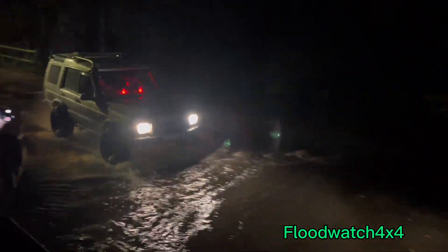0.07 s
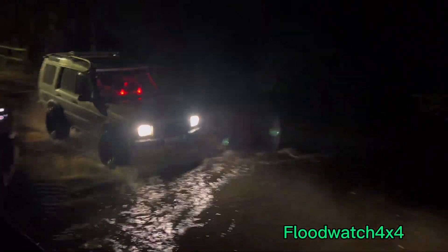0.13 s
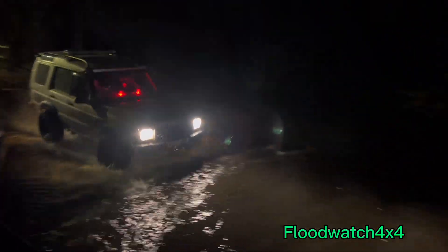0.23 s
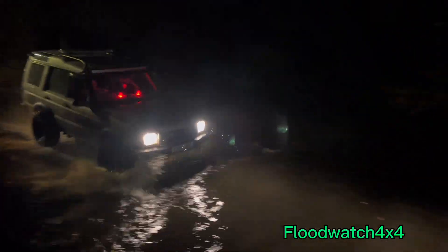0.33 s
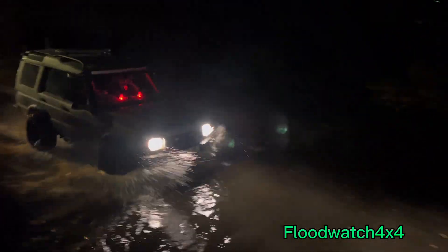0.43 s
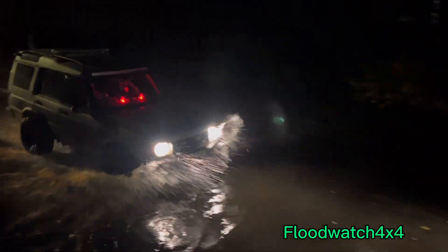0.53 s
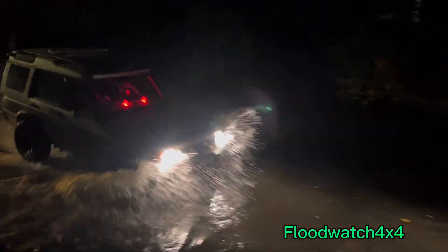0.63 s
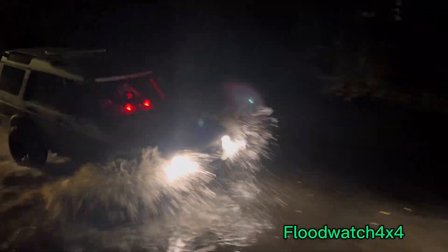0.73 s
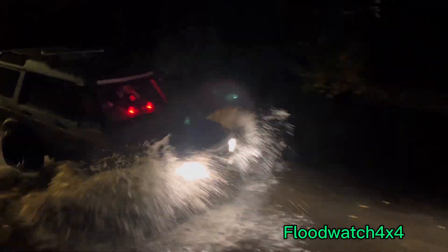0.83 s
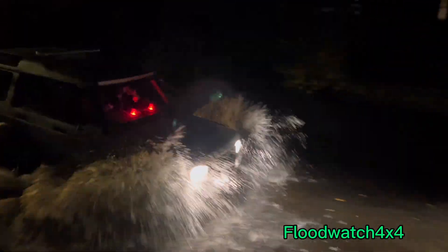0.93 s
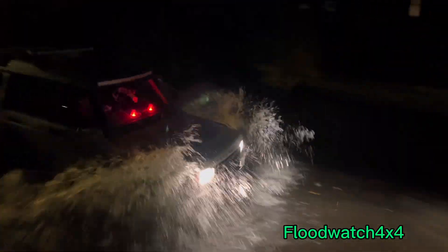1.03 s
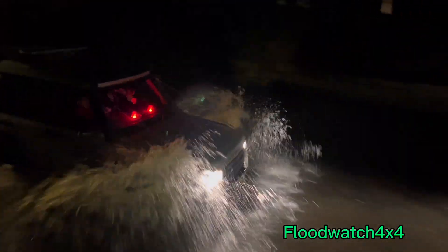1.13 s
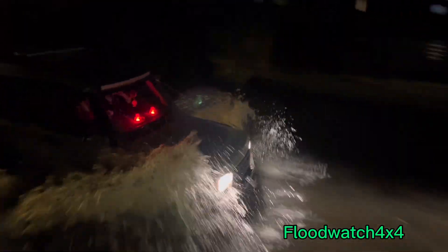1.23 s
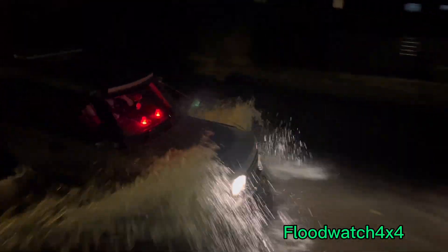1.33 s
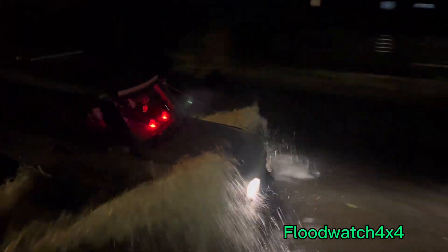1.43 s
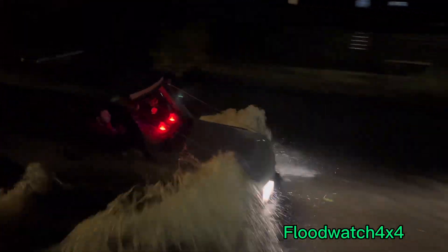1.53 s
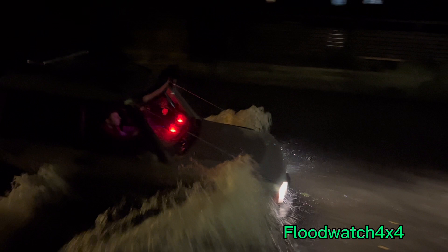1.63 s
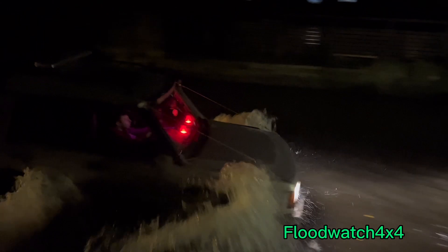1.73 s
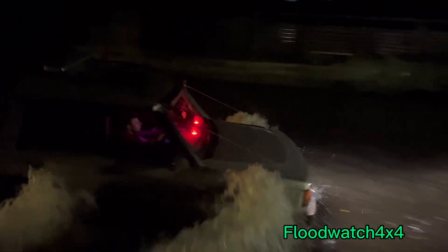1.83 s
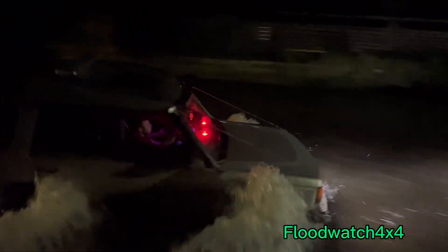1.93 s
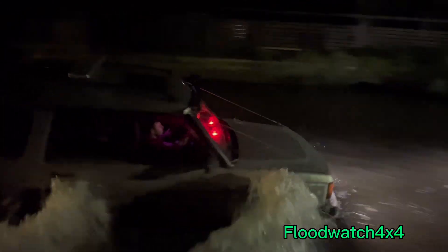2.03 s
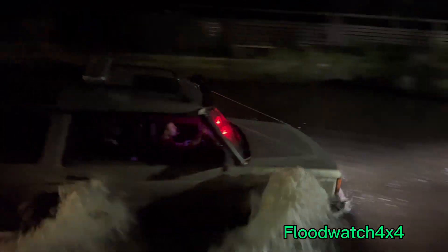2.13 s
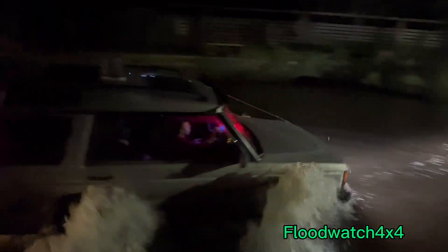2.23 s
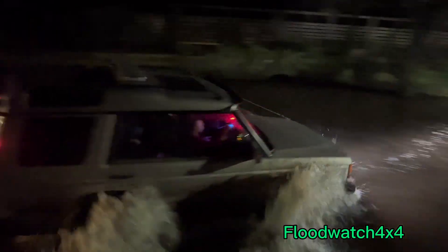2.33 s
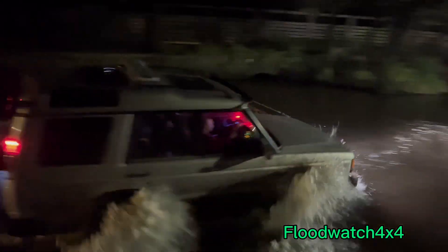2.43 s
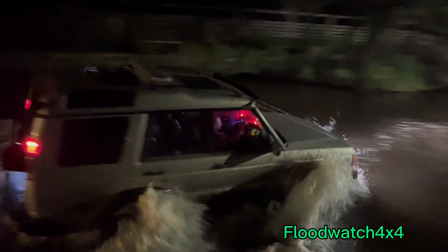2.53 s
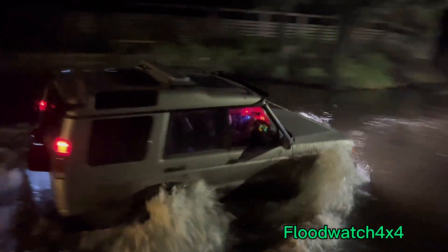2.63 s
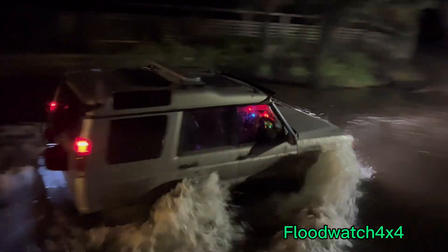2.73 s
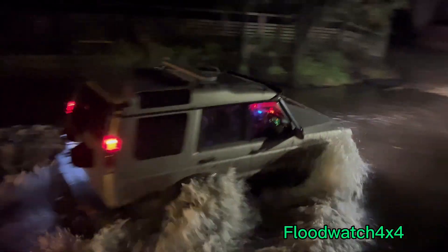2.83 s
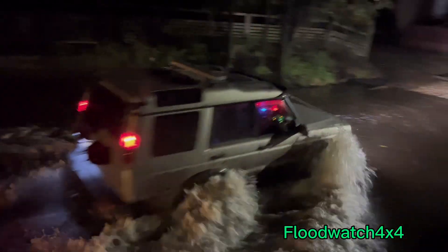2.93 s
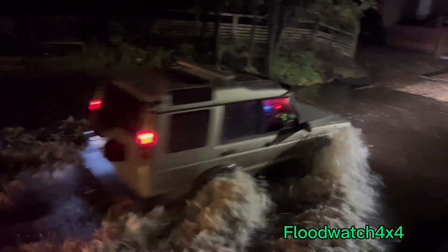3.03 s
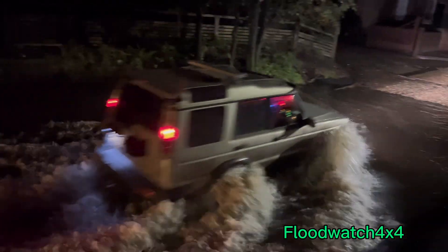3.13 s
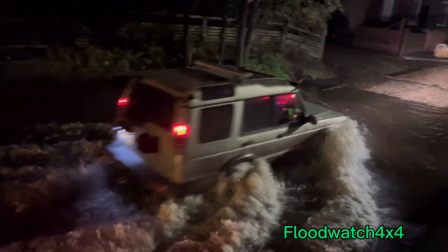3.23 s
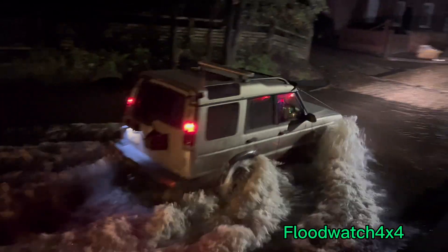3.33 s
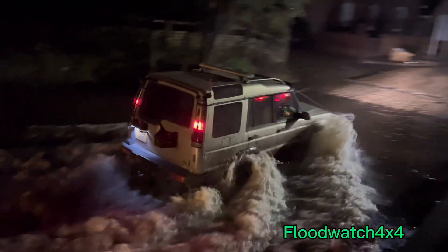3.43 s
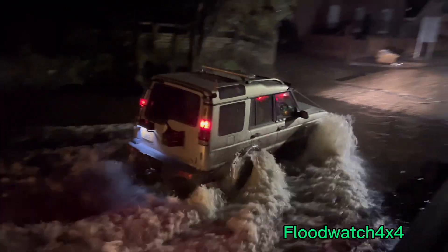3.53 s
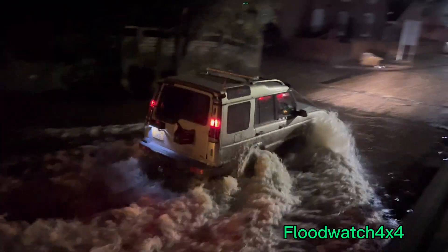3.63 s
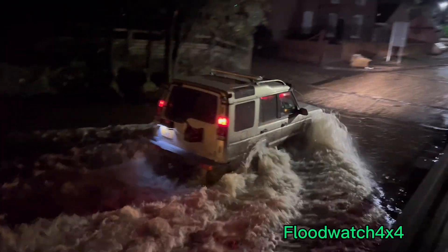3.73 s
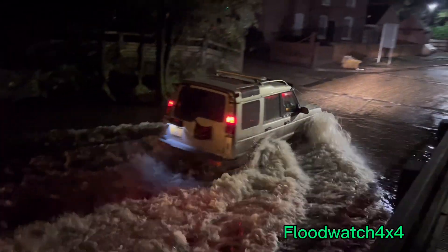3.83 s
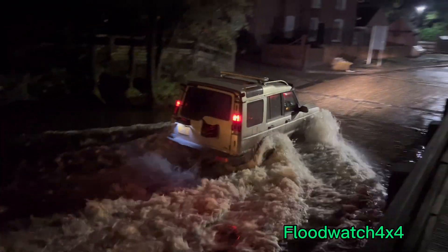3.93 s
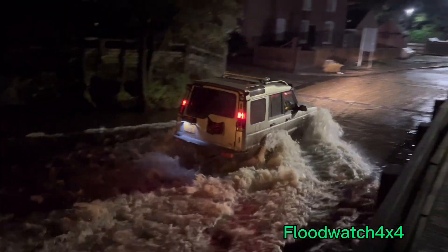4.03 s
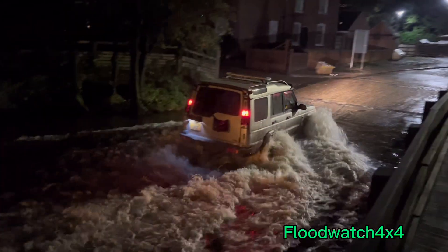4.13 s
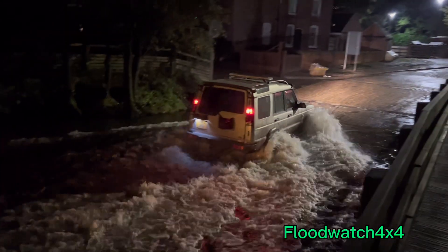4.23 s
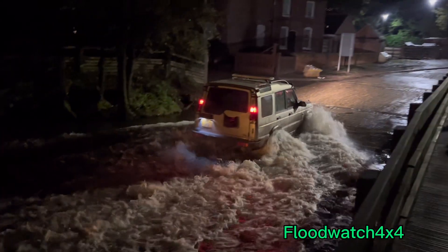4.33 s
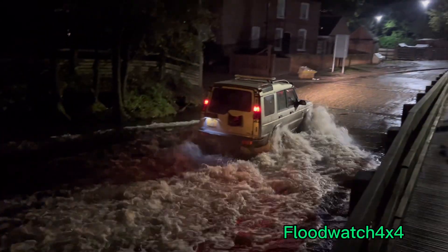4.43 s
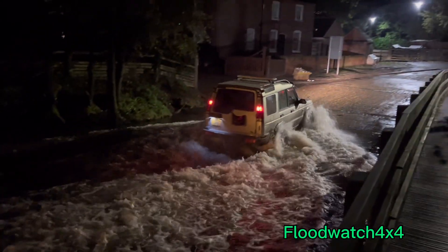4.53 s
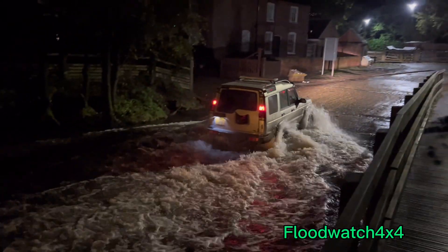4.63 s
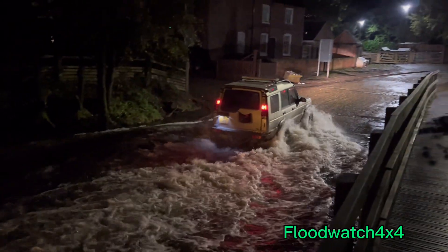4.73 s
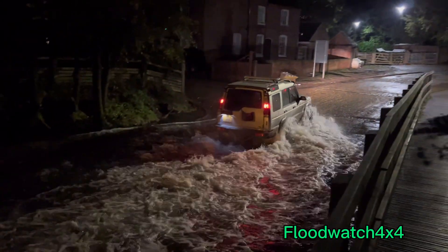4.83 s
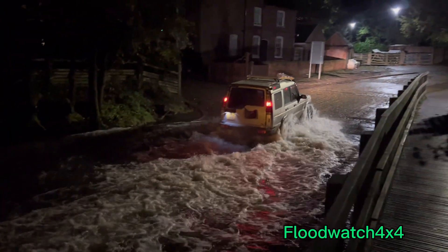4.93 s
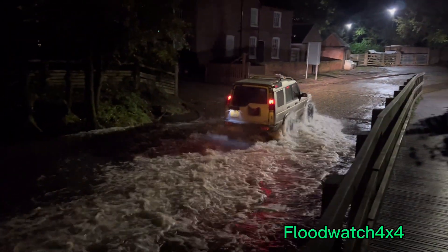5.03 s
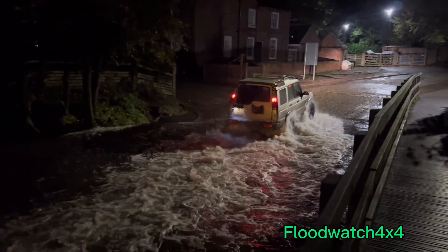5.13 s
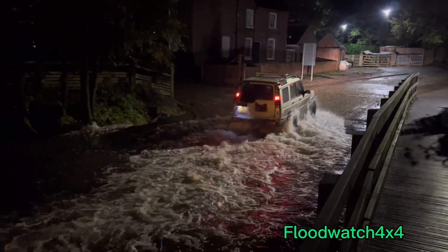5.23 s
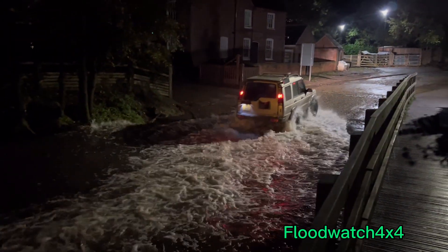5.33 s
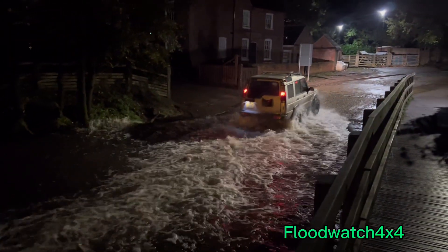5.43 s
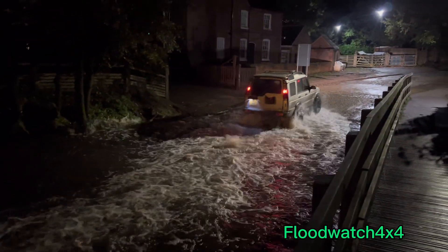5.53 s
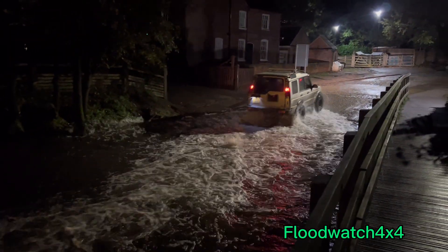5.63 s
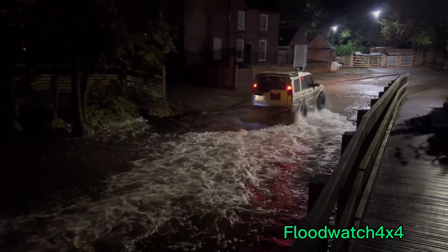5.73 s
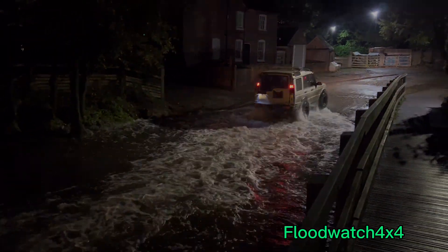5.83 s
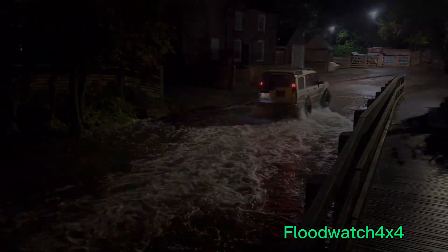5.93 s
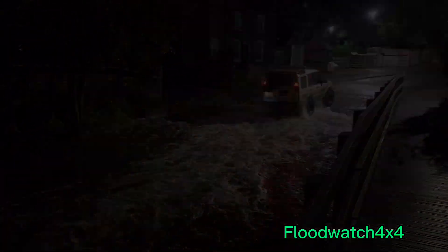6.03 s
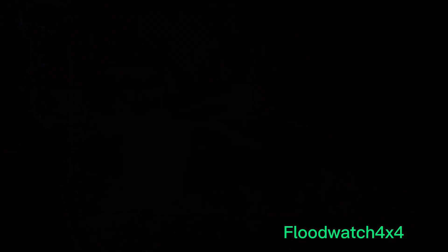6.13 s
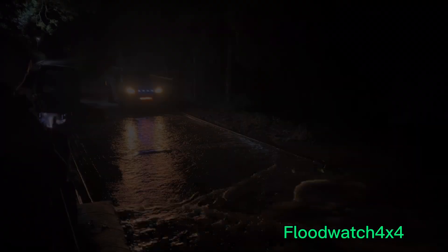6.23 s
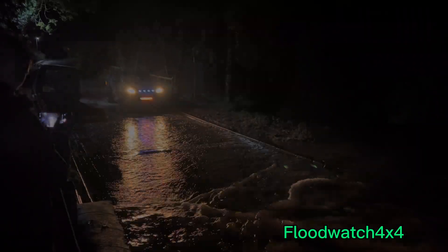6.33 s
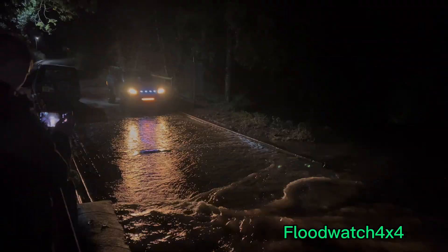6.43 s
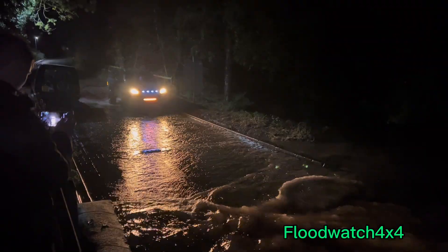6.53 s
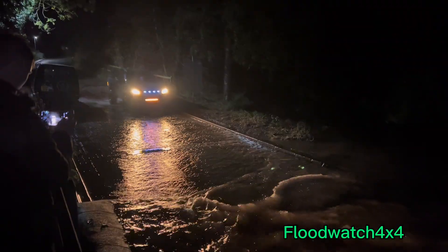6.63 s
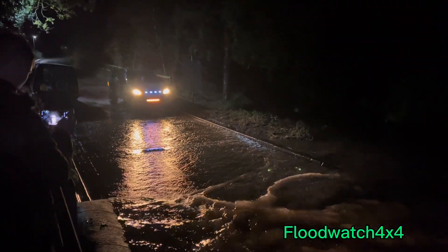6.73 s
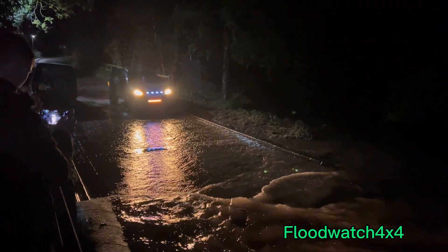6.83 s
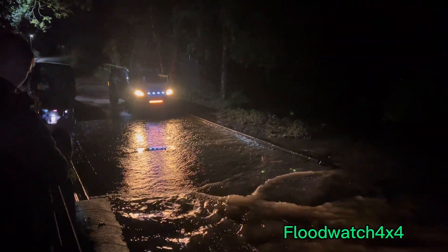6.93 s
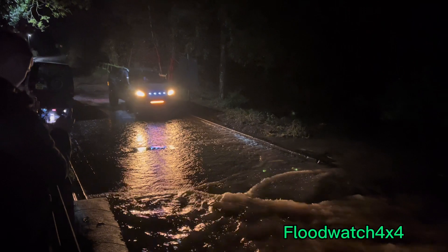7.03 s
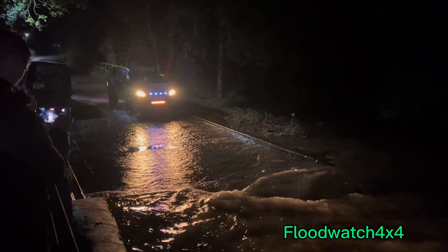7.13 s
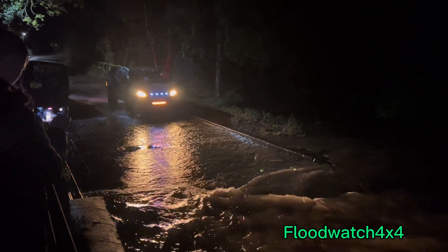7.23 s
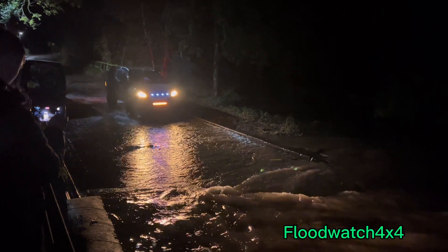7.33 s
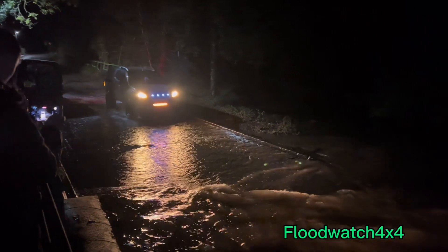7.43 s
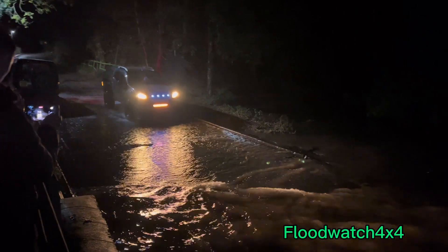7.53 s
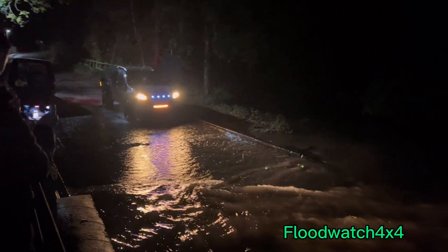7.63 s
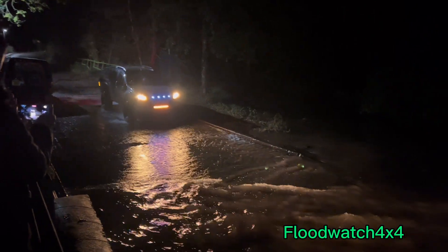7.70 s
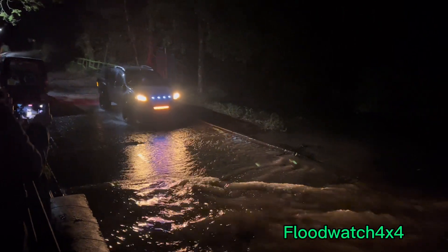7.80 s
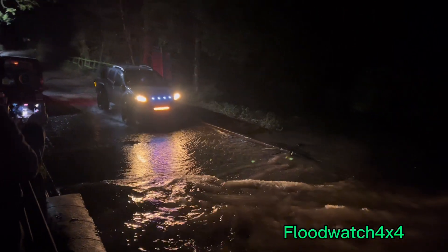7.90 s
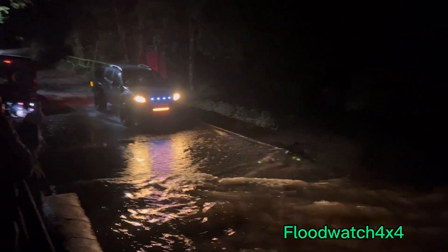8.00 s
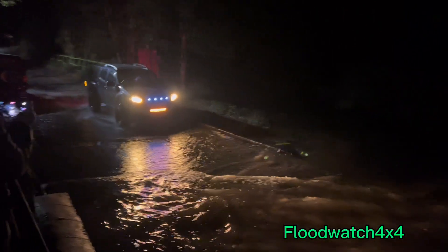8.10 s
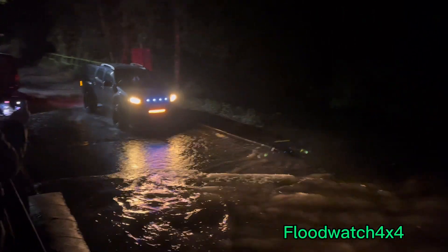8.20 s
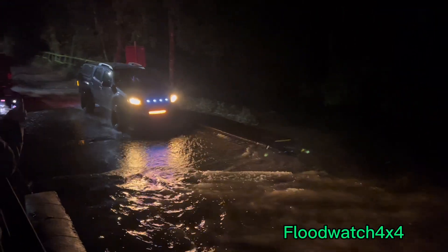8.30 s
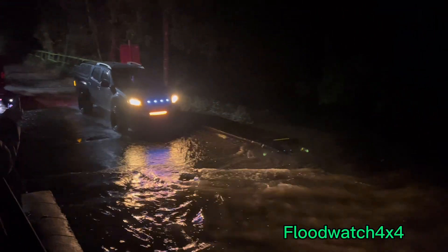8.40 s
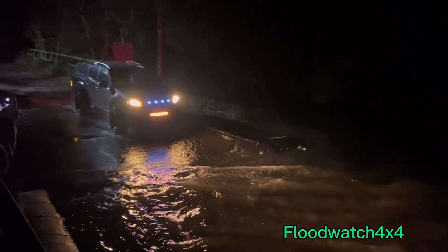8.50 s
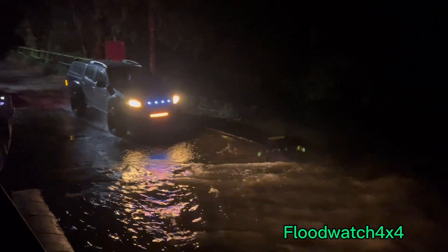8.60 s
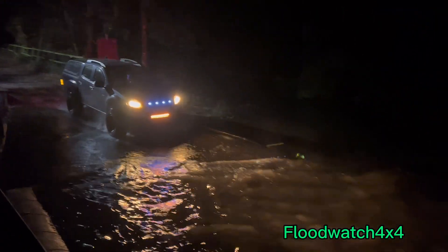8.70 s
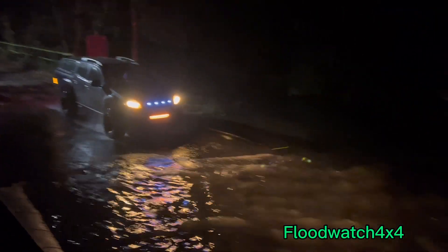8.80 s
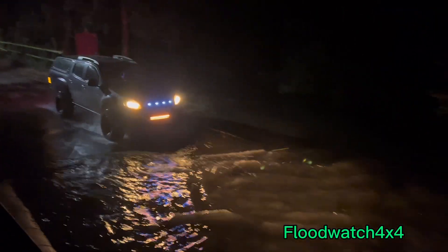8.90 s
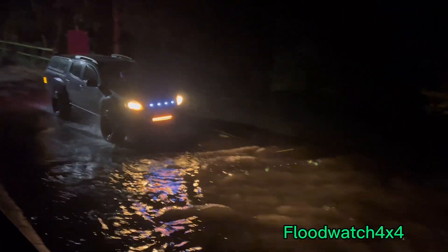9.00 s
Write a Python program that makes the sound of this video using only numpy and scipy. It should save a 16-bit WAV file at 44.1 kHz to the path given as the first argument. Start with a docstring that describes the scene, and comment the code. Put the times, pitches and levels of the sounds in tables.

```python
"""A five-cylinder diesel 4x4 wades past the microphone at close range, at a flooded ford by night.
Its exhaust is a sum of multiples of the firing rate, its growl the fifths between, its rasp gated noise.
Wheels throw water: filtered noise and random drops, ringing bubbles, and short bursts for the slaps.
After an abrupt cut the river flows, one engine fades out and the next 4x4 rolls in at idle,
then slowly picks up revs. Two microphone ports hear the water partly alike, with delays."""
import sys
import numpy as np
from scipy import signal
from scipy.fft import rfft, irfft, next_fast_len
from scipy.io import wavfile

SR = 44100
rng = np.random.default_rng(int(sys.argv[2]) if len(sys.argv) > 2 else 0)


def waveform_to_disk(signal):
    """Save audio, clipped to [-1, 1], as 16-bit WAV at the path in sys.argv[1]."""
    frames = np.transpose(np.atleast_2d(signal))
    scaled = np.clip(frames, -1, 1) * 32767
    samples = np.round(scaled).astype(np.int16)
    wavfile.write(sys.argv[1], SR, samples)


N = 399546
TIME = np.arange(N) / SR   # [s]
CUT_S, RESUME_S = 6.16, 6.169

# firing rate: it labours in the deep water, then recovers: (time [s], rate [Hz])
DIESEL_REVS = [(0, 73.85), (.4, 74.14), (.75, 71.6), (1.05, 73), (1.2, 70.34), (1.55, 67.78), (2.35, 67.96),
               (2.5, 69.57), (3.1, 71.6), (3.5, 71.63), (3.8, 73.35), (4.05, 72.44), (4.3, 72.6),
               (4.5, 74.2), (5.38, 72.7), (5.55, 70.45), (5.75, 71.64), (6.15, 69.4)]
# first multiple, the exhaust note: (time [s], level [dB])
EXHAUST_NOTE = [(0, -26), (.1, -21.5), (.4, -19.5), (.75, -20), (1.42, -15), (1.57, -19.5), (1.85, -12.5),
                (2.07, -14), (2.4, -11), (3.4, -9.5), (3.68, -9), (3.8, -11), (4.11, -10), (4.3, -12.5),
                (4.86, -15), (5.1, -22), (5.34, -17.5), (5.95, -20.5), (6.15, -22.5)]
# second multiple swells and fades: (time [s], level [dB], rise [s], fall [s])
SECOND_MULTIPLE = [(2.6, -17, 0.6, 0.7), (3.5, -21, 0.34, 0.28), (4.3, -21.5, 0.2, .12),
                   (4.77, -22, 0.25, 0.16), (5.33, -27, 0.17, 0.5), (0.31, -29, 0.64, 0.35),
                   (1.2, -25, 0.17, 0.3)]
# third multiple, a drone that comes and goes: (time [s], level [dB])
THIRD_DRONE = [(.3, -38), (.6, -31), (.9, -33.5), (1.08, -50), (1.35, -24.5), (1.5, -18), (1.66, -46),
               (2.2, -25.5), (2.5, -25), (3.1, -16.5), (4.3, -22.5), (4.55, -36), (5.1, -29.5), (5.3, -39),
               (5.55, -28.5), (6.15, -32)]
# upper multiples that ring out briefly: (multiple of firing rate, time [s], level [dB], length [s])
RINGING_MULTIPLES = [(4, 0.27, -34, 0.26), (3.6, 0.62, -33, .1), (4, 1.92, -30, 0.25),
                     (4, 3.82, -31.5, 0.34), (3.6, 4.65, -38, 0.62), (5, 1.834, -27.5, 0.14),
                     (5, 2.67, -31.5, 0.1), (5, 3.21, -29.5, 0.19), (5, 3.55, -33, .09),
                     (4, 3.1, -31.5, .17), (3.2, 2.2, -34, .1), (6.2, 2, -37.5, .3), (5, 4.5, -41, .2),
                     (6, 3.87, -39.5, 0.16), (4, 4.95, -35, .15), (4.6, 4.67, -42.5, 0.72),
                     (3.6, 5.85, -38.5, 0.3), (5, 6.05, -47, 0.18)]
# fifths, from five unequal cylinders: (multiple of firing rate, relative level [dB])
GROWL_FIFTHS = [(.8, -4), (1.2, -1), (1.4, -2), (1.6, -14), (2.2, -9), (2.4, -12.5), (2.6, -1), (2.8, -7),
                (3.2, -4.5), (3.4, -8.5), (3.6, -6.5), (3.8, -8), (4.2, -7.5), (4.4, -10.5), (4.8, -14),
                (5.2, -8.5), (6, -12), (6.2, -17), (6.4, -14)]
# growl comes forward on entering, as bonnet and tailpipe pass, and on the climb out:
# (time [s], level [dB], rise [s], fall [s])
GROWL_FORWARD = [(.25, -37.5, 0.48, 0.46), (1.84, -28, 0.15, 0.21), (3.15, -25, 0.46, 0.52),
                 (6, -40, 3.8, 0.54)]
WAVER_DB = .45    # slow unsteadiness of the exhaust note, more for each multiple
STROKE_DB = .55   # single strokes differ in weight


def passing_diesel():
    """A booming exhaust, a growl from its unequal cylinders and a rasp at each firing."""
    (hz,), (note_db,), (drone_db,) = in_time(DIESEL_REVS), in_time(EXHAUST_NOTE), in_time(THIRD_DRONE)
    growl_db = swelling(GROWL_FORWARD)
    turn = firings(hz, jitter=.003)
    boom = hum(turn, [note_db, swelling(SECOND_MULTIPLE), drone_db], waver_db=WAVER_DB)
    boom = boom * from_db(STROKE_DB * drift(60))
    for k, s, db, length in RINGING_MULTIPLES:
        level = np.sqrt(2) * from_db(db + 2.4 * drift(7.6)) * bump(s, length)
        boom = boom + level * np.cos(2 * np.pi * k * turn)
    growl = 0
    for k, db in GROWL_FIFTHS:
        level = np.sqrt(2) * from_db(db - 3.0 + 3.1 * drift(4.4))
        phase = k * turn + rng.random() + 0.054 * drift(2.3)
        growl = growl + level * np.cos(2 * np.pi * phase)
    rasp = rms_one(band(rng.standard_normal((2, N)), 400, 2160)) * puffs(turn, sharpness=2.9)
    common = boom + from_db(growl_db) * growl
    return np.array([common, np.zeros(N)]) + from_db(growl_db - 8.5) * rasp


# each zone of the water swells and fades as the diesel passes:
# (frequency [Hz], loudest at [s], approach [s], retreat [s])
WATER_PASSING = [(594, 2.29, 1.94, 1.32), (1220, 1.82, 3.2, 1.32), (2400, 2.13, 1.6, 1.12),
                 (5340, 1.86, 1.67, 0.91), (9000, 1.88, 1.45, 0.91)]
# sheets of the bow wave break close by: (time [s], length [s], limit of swell far up the treble [dB])
BREAKING_SHEETS = [(.15, 0.15, 3), (1.06, .05, 2.3), (1.35, 0.078, 1.5), (1.56, 0.023, 1.5),
                   (1.67, 0.15, 2)]
CRASH_ABOVE_HZ = 700   # breaking sheets swell only the treble
# the bumper digs in and throws a fine mist and some coarser spray
PLUNGE_S, PLUNGE_RISE_S, PLUNGE_MIST_DB, PLUNGE_SPRAY_DB = 0.54, 0.14, 3.5, 3.5
# colour of the close water: (frequency [Hz], relative level per Hz [dB])
NEAR_WATER_COLOUR = [(25, -82), (48, -51.5), (100, -47.5), (180, -52), (300, -55.5), (480, -57), (800, -58),
                     (1400, -61.5), (2300, -63), (4200, -65), (6500, -66), (8600, -65.5), (11500, -71.5),
                     (15500, -77)]


def near_water():
    """Bow wave, froth and wheel spray, with the beat of the engine running through the spray."""
    crash_db = sum(db * bump(s, length) for s, length, db in BREAKING_SHEETS)
    plunge = ramp(PLUNGE_S, PLUNGE_RISE_S)
    *zones, (spray_hz, spray_db), (mist_hz, mist_db) = [
        (hz, pass_by(*timing) + crash_db * max(1 - CRASH_ABOVE_HZ / hz, 0))
        for hz, *timing in WATER_PASSING]
    zones += [(spray_hz, spray_db + PLUNGE_SPRAY_DB * plunge), (mist_hz, mist_db + PLUNGE_MIST_DB * plunge)]
    spray = rush(zones, TIME < CUT_S, NEAR_WATER_COLOUR, drops_per_s=5000, drop_share=0.28,
                 flicker_db=1.0, surge_db=0.28)
    beat = puffs(firings(in_time(DIESEL_REVS)[0], jitter=.006), sharpness=0.04)
    churn_db = zones[0][1]
    froth = bubbles(churn_db - 34, per_s=300, low_hz=523, high_hz=2000, cycles=24, spread_db=3.5)
    return from_db(-1.5) * spray * beat + froth


WAKE_DB, CHURN_DB, FIZZ_DB = -34.5, -0.5, -0.5   # churn and fizz are relative to the wake
CLODS_PER_S, CLOD_DECAY_S, CLOD_DB, SPATTER_DB = 75, 0.0058, -34.5, -37.5


def wake():
    """Water tumbles behind the rear wheel: ringing bubbles, a fizz of spray and clods that spatter."""
    db = WAKE_DB + pass_by(loudest_s=3.3, approach_s=0.43, retreat_s=0.77)
    gurgle = bubbles(db, per_s=380, spread_db=2.5, low_hz=1120, high_hz=1483.3, cycles=26.0)
    churn = bubbles(db + CHURN_DB, per_s=380, spread_db=2.5, low_hz=640, high_hz=890, cycles=12)
    fizz = rms_one(band(drops(6000, spread_db=6.0), 4050, 5900))
    fizz = fizz * from_db(WAKE_DB + FIZZ_DB + pass_by(3.18, 0.96, 0.29))
    # each clod is a decaying burst of noise, which also throws up fine drops
    impacts = np.abs(drops(CLODS_PER_S, spread_db=0.5)[0])
    landings = signal.lfilter([1], [1, -np.exp(-1 / (CLOD_DECAY_S * SR))], impacts + 1e-18)
    bursts = landings * rng.standard_normal((2, N))
    clods = rms_one(band(bursts, 760, 1900)) * from_db(CLOD_DB + pass_by(3.4, .6, 0.6))
    spatter = rms_one(band(bursts, 2240, 5800)) * from_db(SPATTER_DB + pass_by(3.2, 0.8, .55))
    return gurgle + churn + fizz + clods + spatter


# the loudest slaps of water, near and far: (time [s], relative peak [dB], pitch [Hz], spatter [0-1])
WATER_SLAPS = [(.213, -18, 860, .1), (1.553, -13, 4500, .6), (1.575, -14, 1180, 0.43),
               (3.0679, -16, 1170, 0.15), (3.133, -16, 710, .15), (3.174, -17, 1000, 0.1),
               (3.242, -15.5, 1449, 0.1), (3.248, -16, 830, 0.15), (3.318, -18, 776, .3),
               (3.3702, -14, 1230, 0.2), (3.386, -19, 760, 0.16), (3.44, -18, 5100, 0.25),
               (3.512, -16.5, 724, 0.09), (3.5941, -18, 1231, 0.3), (3.6498, -16, 1480, 0.18),
               (3.654, -19, 2160, 0.2), (3.73, -18, 1182, 0.3), (3.853, -15.5, 1249, 0.14),
               (3.924, -20, 1290, 0.17), (4.005, -21, 1331, 0.2), (4.063, -21, 918, .1),
               (4.104, -20, 764, 0.09), (4.173, -21, 1180, 0.04), (4.473, -23, 1292, 0.12),
               (6.2295, -38, 2100, .05), (6.4318, -31, 2110, .05), (6.4816, -25, 2210, 0.4),
               (6.6393, -25, 2047, 0.4), (6.637, -28, 3350, .15), (6.8, -24, 2130, .35),
               (7.098, -26, 5060, 0.9), (7.28, -27, 5730, 0.42), (7.4854, -29, 1600, .1),
               (7.7323, -22, 2230, 0.4), (7.7934, -20, 2170, .4), (7.9683, -23, 1560, .05),
               (8.2916, -24, 2210, 0.4), (8.296, -27, 5530, .2), (8.398, -19, 1670, 0.15),
               (8.5476, -19, 2160, .35)]
SLAP_DECAY_S, SLAP_WIDTH = 0.01, 0.077   # width either way, as a share of the pitch


def slaps(level_db):
    """A lump of water lands: a short burst, coloured by the air pocket that it traps."""
    out, age = np.zeros((2, N)), TIME[:SR // 5]
    envelope = np.exp(-age / SLAP_DECAY_S) * (1 - np.exp(-age / .002))
    for s, db, hz, spatter in WATER_SLAPS:
        burst = rng.standard_normal((2, len(age))) * envelope
        slap = band(burst, hz / (1 + SLAP_WIDTH), hz * (1 + SLAP_WIDTH)) + spatter * band(burst, 1700, 3860)
        start = round(s * SR)
        out[:, start:start + len(age)] += from_db(db + level_db) * slap / np.abs(slap).max()
    return out


# tight runs of bubbles of about one size: (time [s], length [s], peak before the ports [dB], pitch [Hz])
BUBBLE_RUNS = [(0.501, .05, -21, 1000), (2.059, 0.037, -24, 901), (3.425, 0.027, -15, 1250),
               (6.64, 0.033, -25, 2030), (6.637, .03, -30, 2750), (6.64, .025, -31, 3470),
               (6.892, 0.021, -30, 2720), (7.133, 0.054, -30, 980), (7.5, .06, -25.5, 2200),
               (7.799, .1, -26, 2140), (7.861, 0.054, -27, 1560), (8.017, .04, -27, 1460),
               (8.371, .05, -21, 1620), (8.59, .025, -25, 1550), (8.7, 0.075, -24, 1470),
               (8.72, .03, -25, 2150), (8.812, 0.021, -25, 2720)]


def gurgles(cycles, pitch_spread, count=6):
    """A larger air pocket breaks up into a quick, uneven run of like bubbles."""
    out, age = np.zeros((2, N)), TIME[:SR // 5]
    for s, length, db, hz in BUBBLE_RUNS:
        run = 0
        for start in length * (np.arange(count) + rng.random(count)) / count:
            run = run + bubble(age - start, hz * np.exp(pitch_spread * rng.standard_normal()), cycles)
        first = round(s * SR)
        out[0, first:first + len(age)] += from_db(db) * run / np.abs(run).max()
    return out


# engine fading out: (time [s], firing rate [Hz], level [dB])
LEAVING_ENGINE = [(6.18, 64.36, -34), (6.35, 65, -33.5), (6.48, 63.6, -33), (6.57, 61.5, -42),
                  (6.66, 60.4, -30.5), (6.95, 61, -39), (7.2, 60.8, -64)]
LEAVING_SECOND_DB, LEAVING_THIRD_DB = -12.5, -12.5   # multiples, against the first
# the next 4x4 rolls in at idle, then its throttle opens and it takes up the load
IDLE_HZ, THROTTLE_S, REV_HZ_PER_S, LOAD_S = 45.7, 7.68, 8.1, 7.83
IDLE_DB, NEARING_DB_PER_S, THROTTLE_DB, THROTTLE_RISE_S = -38, 13, 8.5, 0.52
# its exhaust resonances, which the rising multiples sweep through: (frequency [Hz], gain [dB])
PIPE_RESONANCES = [(45, -2), (51, -8), (57, -4), (92, -12), (104, -6.5), (111, 3.5), (136, -10), (147, -4),
                   (155, 3.5), (161, -1.5), (169, -11), (182, -15), (196, -7.5), (212, -11.5), (226, -22)]
# faint hums that waver behind the engines, one curve each: (time [s], frequency [Hz], level [dB])
FAINT_HUMS = [
    [(6.2, 155, -51), (6.8, 152, -42.5), (7.1, 149, -50), (7.45, 148, -40.5), (8.1, 149.2, -41.5),
     (8.7, 150, -46), (9, 154, -33.5)],
    [(6.2, 191.1, -46), (6.6, 197.5, -52), (7, 198, -41.5), (7.45, 205, -48.5), (7.9, 200, -56),
     (8.5, 195.6, -50), (9, 198, -48)],
    [(6.2, 111.7, -45), (6.7, 109.6, -51), (7.05, 109.3, -46), (7.4, 107, -54), (7.95, 104, -42),
     (8.3, 104, -52)],
]


def far_engines():
    """One engine fades out; the next draws near at idle, then grows louder as its revs climb."""
    hz, db = in_time(LEAVING_ENGINE)
    multiples_db = [db, db + LEAVING_SECOND_DB, db + LEAVING_THIRD_DB]
    leaving = hum(firings(hz, jitter=0.006), multiples_db, waver_db=1.0)
    since_throttle = TIME - THROTTLE_S
    hz = IDLE_HZ + REV_HZ_PER_S * np.maximum(since_throttle, 0)
    db = IDLE_DB + NEARING_DB_PER_S * np.minimum(since_throttle, 0)
    db = db + THROTTLE_DB * ramp(LOAD_S, THROTTLE_RISE_S)
    multiples_db = [db + at_hz(PIPE_RESONANCES, k * hz) for k in (1, 2, 3, 4)]
    coming = hum(firings(hz, jitter=.002), multiples_db, waver_db=.3)
    behind = sum(hum(firings(hz, jitter=.003), [db], waver_db=.5) for hz, db in map(in_time, FAINT_HUMS))
    return leaving + coming + behind


# the next vehicle's wash grows in each zone: (frequency [Hz], growth [dB/s])
WASH_RISE = [(200, 1), (480, 4.5), (750, 5), (1230, 3), (2400, 2.5), (5300, 3), (9000, 3.5)]
# its wheels throw short splashes: (time [s], limit of swell far up the treble [dB])
WHEEL_SPLASHES = [(6.86, 2.5), (7.45, 2), (7.81, 4.5), (8.38, 3), (8.6, 3.5), (8.75, 3.5), (8.97, 1.5)]
SPLASH_S, SPLASH_ABOVE_HZ = 0.055, 730
# colour of the river and wash: (frequency [Hz], relative level per Hz [dB])
FAR_WATER_COLOUR = [(25, -85), (48, -57), (100, -58.5), (180, -61.5), (300, -65), (480, -70.5), (800, -64),
                    (1400, -64), (2300, -69), (4200, -74.5), (6500, -75.5), (8600, -79.5), (11500, -86),
                    (15500, -92)]


def far_water(echo_s, echo_gain, echo_top_hz):
    """The river and the next vehicle's growing wash; a close reflection hollows the sound."""
    splash_db = sum(db * bump(s, SPLASH_S) for s, db in WHEEL_SPLASHES)
    since_resume = np.maximum(TIME - RESUME_S, 0)
    zones = [(hz, growth * since_resume + splash_db * max(1 - SPLASH_ABOVE_HZ / hz, 0))
             for hz, growth in WASH_RISE]
    flow = from_db(-1) * rush(zones, TIME > RESUME_S, FAR_WATER_COLOUR, drops_per_s=2600, drop_share=0.39,
                              flicker_db=1.43, surge_db=0.5)
    churn_db = zones[0][1]
    flow = flow + bubbles(churn_db - 49.5, per_s=150, low_hz=686, high_hz=3380, cycles=23, spread_db=4.0)
    echo = signal.sosfiltfilt(signal.butter(1, [450, echo_top_hz], "band", fs=SR, output="sos"), flow)
    return flow - echo_gain * np.array([np.interp(TIME - echo_s, TIME, side) for side in echo])


# river babble in clusters of bubble sizes: (lowest [Hz], highest [Hz], level at throttle opening [dB])
RIVER_BABBLE = [(865, 1060, -47.5), (1385, 1670, -48), (1940, 2250, -45.5), (2610, 2860, -48.5),
                (3150, 3650, -49)]
TRICKLE_DB_PER_S = 2.5   # the next vehicle stirs it up


def trickle():
    """Plops and small, bright plinks of the river running past the bank."""
    stirred_db = TRICKLE_DB_PER_S * (TIME - THROTTLE_S)
    return sum(bubbles(db + stirred_db, per_s=120, low_hz=low, high_hz=high, cycles=40, spread_db=2.0)
               for low, high, db in RIVER_BABBLE)


def rush(zones, during, colour, drops_per_s, drop_share, flicker_db, surge_db):
    """Countless drops over a smooth wash; each half octave swells with its zone of the water."""
    zones_hz = [hz for hz, _ in zones]
    # each swell has mean power 1 while its scene plays
    swells = [db - 10 * np.log10(np.mean(from_db(db[during]) ** 2)) for _, db in zones]
    share = np.clip(drop_share, 0, 1)
    grains = []
    for _ in range(2):   # neighbouring bands draw on different grains
        patter = np.sqrt(share) * drops(drops_per_s, spread_db=3.5)
        grains.append(patter + np.sqrt(1 - share) * rng.standard_normal((2, N)))
    edges = 22 * 2 ** np.arange(0, 10, .5)
    out, surge = 0, surge_db * rms_one(drift(2.2) + 0.92 * drift(30))
    for k, (low, high) in enumerate(zip(edges, edges[1:])):
        hz = np.sqrt(low * high)
        weights = [np.interp(np.log(hz), np.log(zones_hz), w) for w in np.eye(len(swells))]
        swell = sum(w * s for w, s in zip(weights, swells) if w)
        level_db = at_hz(colour, hz) + swell + surge + flicker_db * drift(16.4)
        out = out + band(grains[k % 2], low, high) * from_db(level_db)
    return out * np.sqrt(SR / 2)


def drops(per_s, spread_db):
    """Two unrelated streams of random impacts, many small and a few large; rms 1."""
    sizes = from_db(spread_db * np.minimum(rng.exponential(1, (2, N)), 5))
    signs = rng.choice([-1, 1], (2, N))
    return rms_one(sizes * signs * (rng.random((2, N)) < per_s / SR))


def bubbles(level_db, per_s, low_hz, high_hz, cycles, spread_db):
    """Bubbles at random moments and places, each with its own pitch, many faint and a few loud."""
    born, pitch, strength, place = rng.random((int(per_s * N / SR), 4)).T[:, :, None]
    steps = np.arange(int(.7 * SR * cycles / low_hz))
    loudness = from_db(spread_db * np.minimum(-np.log(strength), 3.5))
    rings = loudness * bubble(steps / SR, low_hz * (high_hz / low_hz) ** pitch, cycles)
    at = ((born * N).astype(int) + steps).ravel()
    pair = [np.bincount(at, (rings * share(2 * np.pi * place)).ravel(), N)[:N] for share in (np.cos, np.sin)]
    return from_db(level_db) * rms_one(np.array(pair))


BUBBLE_RISE = 0.074   # half the share by which a bubble's pitch climbs in its life


def bubble(age_s, hz, cycles):
    """One pocket of air rings, climbs in pitch and loses 60 dB within so many cycles of its first pitch."""
    life = np.maximum(age_s, 0) * hz / cycles
    return np.exp(-np.log(1000) * life) * np.sin(2 * np.pi * cycles * life * (1 + BUBBLE_RISE * life))


def firings(hz, jitter):
    """Running count of firings; the crankshaft turns a little unevenly."""
    return np.cumsum(hz) / SR + jitter * drift(8.2)


def hum(turn, levels_db, waver_db):
    """Lowest multiples of the firing rate, the higher the less steady, each delayed by the exhaust pipe."""
    out = 0
    for k, db in enumerate(levels_db, 1):
        level = np.sqrt(2) * from_db(db + k * waver_db * drift(10))
        out = out + level * np.cos(2 * np.pi * (k * turn + k * k / 8))
    return out


def puffs(turn, sharpness):
    """A gate of rms 1 that opens once a firing."""
    return rms_one(np.exp(sharpness * np.cos(2 * np.pi * turn)))


SPREADING_DB = 15.5   # lost for each tenfold of squared distance from the microphone


def pass_by(loudest_s, approach_s, retreat_s):
    """Level in dB of a source that draws near and moves off, 0 at its closest."""
    along = (TIME - loudest_s) / np.where(TIME < loudest_s, approach_s, retreat_s)
    return -SPREADING_DB * np.log10(1 + along ** 2)


def swelling(rows):
    """Level in dB of overlapping swells, their powers added."""
    return 10 * np.log10(sum(from_db(db + pass_by(s, rise, fall)) ** 2 for s, db, rise, fall in rows))


def bump(s, length_s):
    """A short rounded rise and fall, of height 1."""
    return np.exp(-((TIME - s) / length_s) ** 2)


def ramp(start_s, rise_s):
    """Rises from 0 to 1 and stays."""
    return np.clip((TIME - start_s) / rise_s, 0, 1)


def drift(rate):
    """Slow chance of spread 1, drawn every 40 samples; a higher rate [Hz] is quicker."""
    r = np.exp(-80 * np.pi * rate / SR)
    slow = signal.lfilter([1], [1, -2 * r, r * r], rng.standard_normal(N // 40 + 2002))[2000:]
    return np.interp(np.arange(N) / 40, np.arange(len(slow)), rms_one(slow))


def band(x, low_hz, high_hz):
    """Gentle band-pass."""
    edges = [low_hz, min(high_hz, SR / 2.1)]
    return signal.sosfilt(signal.butter(2, edges, "band", fs=SR, output="sos"), x + 1e-18)


def from_db(db):
    """Decibels to gain."""
    return 10 ** (np.asarray(db) / 20)


def rms_one(x):
    """Scale to rms 1."""
    return x / np.sqrt(np.mean(x ** 2) + 1e-20)


def in_time(rows):
    """Each column of a curve table, sample by sample."""
    s, *columns = np.transpose(rows)
    return [np.interp(TIME, s, c) for c in columns]


def at_hz(points, hz):
    """Read a table on a log-frequency axis."""
    points = np.array(points)
    return np.interp(np.log(hz + 1e-9), np.log(points[:, 0]), points[:, 1])


# balance of the two microphone ports: (frequency [Hz], left over right [dB])
PORT_BALANCE = [(70, .2), (140, .9), (250, 1), (500, 3.6), (1000, 4.2), (2000, 3), (4500, 3), (8000, .2),
                (15000, 0)]
TREBLE_HZ, TREBLE_LAG_S = 8400, .000274   # above this pitch the ports differ by a plain delay


def ports(pair, facing):
    """Two unrelated signals become the partly alike, slightly delayed sound at two microphone ports."""
    size = next_fast_len(N + 4096)
    hz, (common, own), facing = np.arange(size // 2 + 1) * SR / size, rfft(pair, size), np.array(facing)
    most = np.interp(hz, [300, 3000], [.997, .86])   # the ports are never wholly alike
    alike = np.clip(at_hz(facing[:, :2], hz), 0, most)
    tilt = from_db(at_hz(PORT_BALANCE, hz) / 2)
    lead = at_hz(facing[:, ::2], hz) - 2 * np.pi * TREBLE_LAG_S * np.maximum(hz - TREBLE_HZ, 0)
    right = (alike * common + np.sqrt(1 - alike ** 2) * own) * np.exp(-1j * lead)
    return irfft([common * tilt, right / tilt], size)[:, :N]


# ports facing the close pass, then the far water: (frequency [Hz], likeness [0-1], lead of left [rad])
NEAR_FACING = [(71.4, 0.95, 0.1), (140, 1, 0.28), (250, 1, 0.19), (400, 1, 0.46), (1000, 0.66, 0.51),
               (1510, 0.16, 1.54), (1800, 0, 5.2), (2160, 0.67, 7.3), (2790, 0.62, 7.8), (4200, 0.42, 6.6),
               (5370, 0.12, 6.2), (6340, 0.9, 7.3), (7360, 0.2, 8.2), (8140, 0.9, 6.17)]
FAR_FACING = [(70, 1, 0.5), (250, 0.9, 0.24), (500, 1, 0.75), (1044, 0.65, 0.07), (1280, 0.45, 3.5),
              (1434, 0.93, -1), (1850, 0.88, 3.5), (2180, 0.97, 6), (2480, .25, 8.5), (2660, 0.56, 7),
              (3630, 0.55, 8), (4360, 0.37, 10), (5800, 0.63, 12), (7500, 0.47, 15), (9000, 1, 12.5)]
CUT_DIP_DB = -11   # the level dips briefly between the two scenes


def scene():
    """The close pass, an abrupt cut, then the wait for the next vehicle."""
    lumps = slaps(level_db=-1.5) + gurgles(cycles=24, pitch_spread=0.03)
    first = ports(passing_diesel() + near_water() + wake() + lumps, NEAR_FACING)
    river = far_water(echo_s=0.000763, echo_gain=0.26, echo_top_hz=3500) + trickle()
    second = far_engines() + ports(river + lumps, FAR_FACING)
    second_gain = np.where(TIME > RESUME_S, 1, from_db(CUT_DIP_DB) * (TIME >= CUT_S))
    return first * (TIME < CUT_S) + second * second_gain


CUTOFF_HZ = 15600


def record(dry):
    """The highest peaks are rounded and the top is cut."""
    rounded = dry / (1 + (dry / 1.05) ** 8) ** (1 / 8)
    return signal.sosfilt(signal.ellip(10, .1, 80, CUTOFF_HZ, fs=SR, output="sos"), rounded)


dry = scene()
out = record(dry)
waveform_to_disk(out)
```